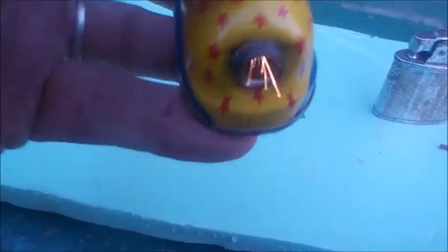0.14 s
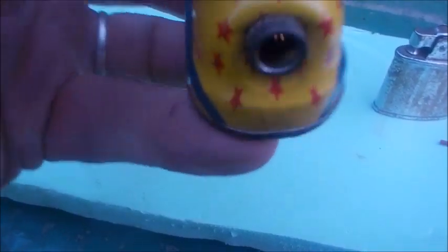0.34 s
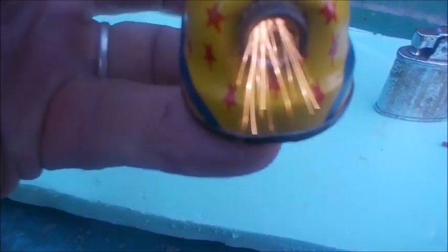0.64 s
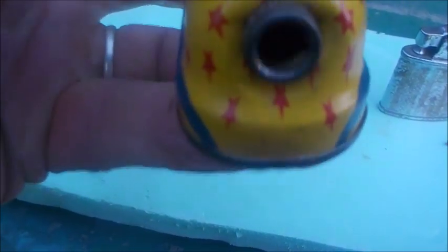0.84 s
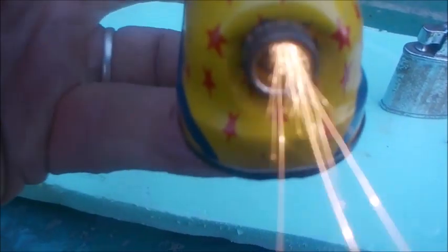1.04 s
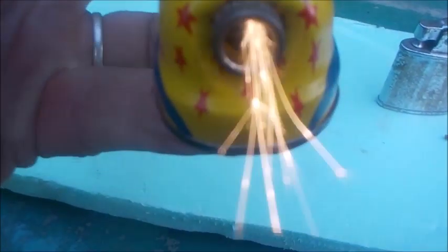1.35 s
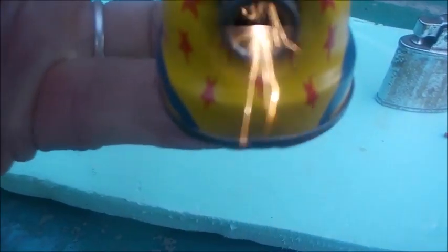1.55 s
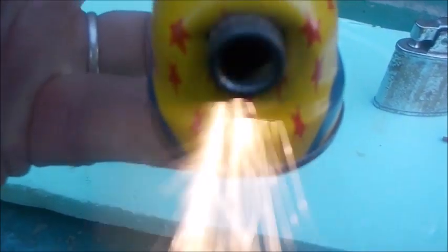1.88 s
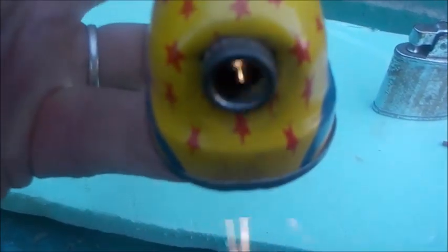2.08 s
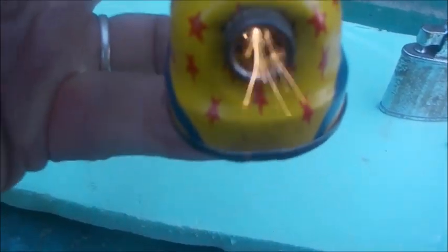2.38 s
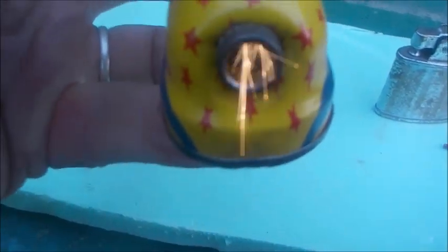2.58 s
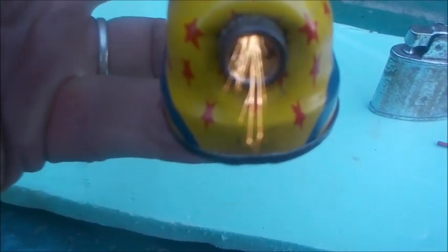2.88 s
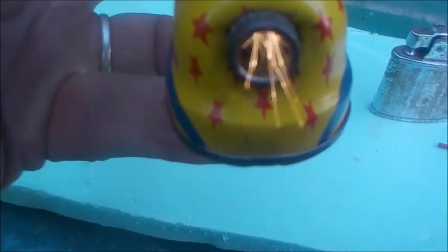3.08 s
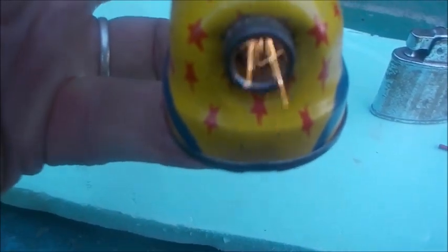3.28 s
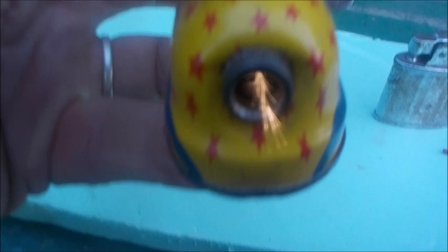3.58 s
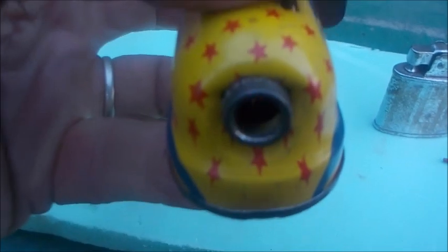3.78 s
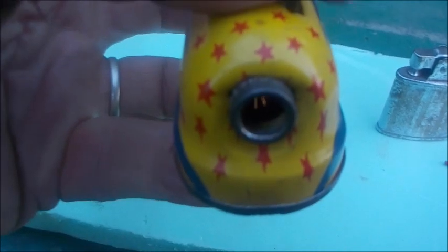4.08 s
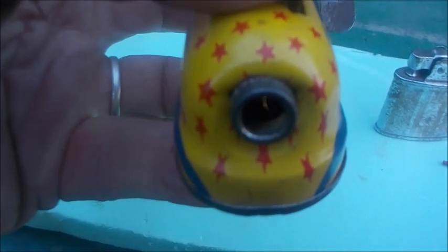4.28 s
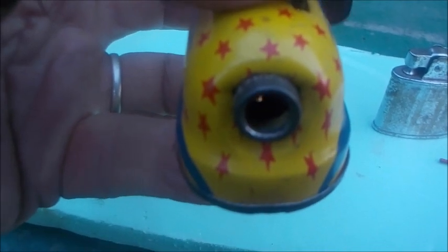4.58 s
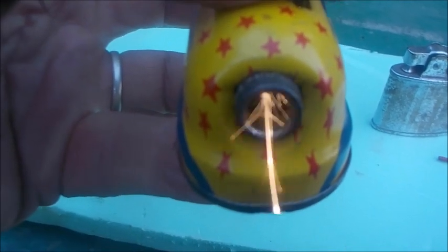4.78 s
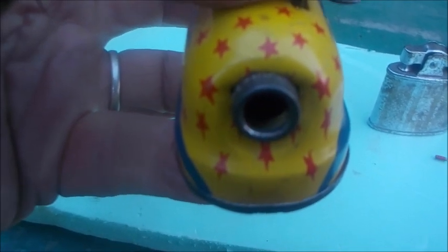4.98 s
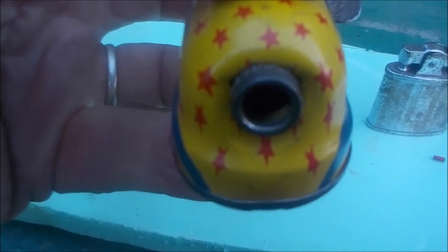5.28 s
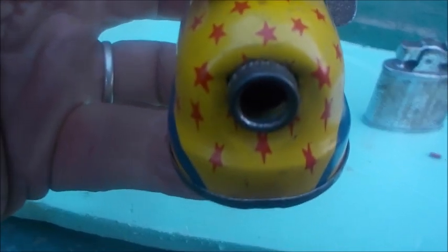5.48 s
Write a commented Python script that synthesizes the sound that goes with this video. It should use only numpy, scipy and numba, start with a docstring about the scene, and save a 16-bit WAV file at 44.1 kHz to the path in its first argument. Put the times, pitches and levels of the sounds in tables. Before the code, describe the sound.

A hand-held clockwork tin toy grinds a rough wheel against flint, very close in stereo in a small indoor space. It spins up within half a second to a shrill, dense rasp with thin hiss, faint gear chatter and scattered sharp clicks. Near five seconds the rasp drops and short bursts of hollow ratchet clacks break in.

```python
"""A tin clockwork sparking toy runs in the hand, close to two microphones indoors.
A gritty wheel grinds on a flint: dense chance impacts, swayed by the flint's pressure, ring flint and body.
The gear train chatters in the tin shell under a thin treble hiss, and snags click as the flint catches.
Near the end the spring goes slack and a ratchet clacks in short runs: impulses that ring the body.
Scatter from table and walls follows; a limiter ducks the highest peaks."""
import sys
import numpy as np
from scipy import signal
from scipy.fft import rfft, irfft
from scipy.io import wavfile
from scipy.ndimage import uniform_filter1d, minimum_filter1d
from numba import njit

SR = 44100
rng = np.random.default_rng(int(sys.argv[2]) if len(sys.argv) > 2 else 0)


def transcribe(signal):
    """Save signal, clipped to [-1, 1], as a 16-bit WAV file at the path in sys.argv[1]."""
    frames = np.atleast_2d(signal).T
    limited = np.clip(frames, -1, 1)
    pcm = np.round(limited * 32767).astype(np.int16)
    wavfile.write(sys.argv[1], SR, pcm)


N = 248724
TIME = np.arange(N) / SR
SIDES = np.array([[1], [-1]])  # left, right

# flint and holder resonance: freq_hz, level_db
FLINT_SPECTRUM = [(200, -102), (2500, -48.5), (3050, -41), (3550, -20), (3950, -13.5), (4380, -3.5),
                  (4820, 1.5), (5150, -8.5), (5600, -7.5), (6200, -13), (6780, -9.5), (7300, -19),
                  (7750, -38.5), (8150, -62.5)]
# wheel's own ring: freq_hz, width_hz, level_db
WHEEL_MODES = [(6787, 295, 0)]
# dull rub of the wheel through the body: freq_hz, level_db
BODY_SPECTRUM = [(30, -39), (70, -47), (250, -22.5), (420, -17), (700, -8), (1050, 0), (1400, 2),
                 (1900, -4.5), (2400, -9), (5000, -85)]
# tin shell rung by the gears: freq_hz, level_db
SHELL_SPECTRUM = [(100, -81), (700, -46), (1000, -30), (1200, -20.5), (1400, -7.5), (1550, 4), (1880, 6),
                  (2020, -3), (2200, -27), (2330, -36), (2450, -70), (4000, -80)]
# shell modes that ring while the grip is loose: freq_hz, width_hz, level_db
LOOSE_MODES = [(1433, 184, -2.5), (1569, 48, 1), (3637, 220, 0.5)]
# thin treble hiss above the rasp, partly distortion: freq_hz, level_db
HISS_SPECTRUM = [(2500, -59), (6000, -26), (8150, -29), (8650, 4.5), (9300, -1.5), (10300, -2.5),
                 (11300, -9), (12300, -3.5), (13600, 3), (15500, -10)]
# gear chatter: time_s, level_db
GEAR_LEVEL = [(0.0, -48.5), (0.14, -36.5), (0.36, -28.0), (0.78, -27.5), (1.02, -32.0), (1.35, -30.0),
              (1.75, -34.0), (2.05, -36.0), (2.33, -36.5), (2.62, -31.0), (2.8, -36.5), (2.92, -35.5),
              (3.38, -36.5), (3.87, -33.0), (4.25, -36.0), (4.6, -37.0), (4.9, -41.0), (5.1, -37.5)]
# toy in the hand: time_s, left_minus_right_db, loose_modes_db
HAND_HOLD = [(0, -2.2, -5), (.5, -1, -9.5), (1.2, -1.5, -12), (1.8, -.5, -30), (3.2, -.5, -20),
             (4.2, -1.5, -8), (5.64, -1.3, -10)]
# wheel and gears between the microphones: freq_hz, left_minus_right_db
WHEEL_BALANCE = [(500, -2), (1300, 0), (1900, 0), (2500, 1.5), (3450, -2.5), (4100, -0.5), (4600, 2.5),
                 (5000, 3.5), (5500, -6.5), (6250, 5.5), (6650, -2.5), (7500, 1), (8100, 1.5)]
# wheel and gears between the microphones: freq_hz, left_lead_rad
WHEEL_PHASE = [(500, .05), (1700, 0.057), (3000, .05), (3400, 0.55), (3850, 0.15), (4300, 0.54),
               (5250, .05), (5700, 0.22), (6500, 0.75), (7500, 0.48), (8500, .15)]


def sparking_wheel():
    """The flint bounces on the wheel; its pressure drives the rasp and shakes the gears."""
    rasp_db = drive()
    gear_db, = follow(GEAR_LEVEL)
    pan_db, loose_db = follow(HAND_HOLD)
    # the wheel starts to ring once the flint bounces on it
    wheel_db = np.interp(TIME, [.7, 1.2, 5], [-28, -8.5, -13])
    # as the spring runs down the gears sink under the rasp
    gear_cap_db = rasp_db + np.interp(TIME, [4.9, 5.15], [-6, -15])
    gear_db = np.minimum(gear_db, gear_cap_db)

    pressure_db = 1.64 * walk(67) + 1.4 * walk(370)
    # the flint only brushes the wheel at first, and bounces more once up to speed
    pressure_db = pressure_db * np.interp(TIME, [0, .45, 1.1], [.45, .65, 1])
    scrape, flank_scrape, rim_scrape = (
        grains(rate_per_s=14000, spread_db=2.0) * undb(pressure_db) for _ in range(3))

    rasp = unit(ring(scrape, FLINT_SPECTRUM)) * undb(rasp_db + 0.3)
    wheel = unit(modes(rim_scrape, WHEEL_MODES)) * undb(rasp_db + wheel_db)
    body = unit(ring(scrape, BODY_SPECTRUM)) * undb(rasp_db - 35.0)
    # rattle of the flanks, opposite in sign at left and right
    flanks = unit(ring(flank_scrape, FLINT_SPECTRUM)) * undb(rasp_db - 13.5)

    chatter = grains(rate_per_s=1800, spread_db=0.5) * undb(0.86 * pressure_db + 1.35 * walk(78))
    gears = unit(ring(chatter, SHELL_SPECTRUM)) * undb(gear_db + 0.56)
    loose_grains = grains(rate_per_s=2500, spread_db=2.5) * undb(pressure_db)
    loose = unit(modes(loose_grains, LOOSE_MODES)) * undb(gear_db + loose_db - 0.5)

    # treble hiss, differing at left and right
    middle, side = (
        unit(ring(rng.standard_normal(N) * undb(pressure_db), HISS_SPECTRUM)) for _ in range(2))
    hiss = (middle + 0.64 * SIDES * side) * undb(rasp_db - 32.0)

    in_room = room(rasp + wheel + body + gears + jolts() + loose, t60_s=0.14, wet_db=-15.0)
    sound = in_room + SIDES * flanks + hiss + snags()
    return ports(sound, WHEEL_BALANCE, WHEEL_PHASE) * undb(SIDES * pan_db / 2)


# wheel spin-up: time_s, level_re_full_speed_db
SPIN_UP_LEVEL = [(0, -14), (.11, -7), (.27, -6.3), (.4, -1.8), (.6, 0)]
# brief dips of the rasp: time_s, depth_db
RASP_LULLS = [(.834, 3.5), (3.188, 6.5)]
LULL_DEEPEST_S = .015
BASE_DB, AT_SPEED_S = -17.6, .6
SURGE_HZ, SURGE_DB, BUILD_S, SETTLE_S = 5.43, 2.0, .15, 0.57
WANDER_DB, WANDER_HZ = .25, 6.2
# spring: slow sag, then a drop as it goes slack and a faster fade
SAG_DB_PER_S, SLACK_AT_S, SLACK_DB, SLACK_S, SLACK_DB_PER_S = -.5, 4.78, -4.5, 0.096, -3.5
STOP_AT_S, STOP_DB_PER_S = 5.54, -42
# the rasp ducks around each run of clacks: lead before the first, time to the deepest dip
DUCK_LEAD_S, DUCK_DEEPEST_S = .002, .018


def drive():
    """Rasp level in dB: spin-up, settling surge, sag, slack spring, stop, ducks around clacks."""
    spin_up_db, = follow(SPIN_UP_LEVEL)
    since_s = TIME - AT_SPEED_S
    surge_envelope = np.exp(-np.abs(since_s) / np.where(since_s > 0, SETTLE_S, BUILD_S))
    surge_db = SURGE_DB * np.cos(2 * np.pi * SURGE_HZ * since_s) * surge_envelope
    sag_db = SAG_DB_PER_S * np.maximum(since_s, 0)
    slack_for_s = np.maximum(TIME - SLACK_AT_S, 0)
    slack_db = SLACK_DB * np.minimum(slack_for_s / SLACK_S, 1) + SLACK_DB_PER_S * slack_for_s
    stop_db = STOP_DB_PER_S * np.maximum(TIME - STOP_AT_S, 0)
    run_s, *_, rasp_duck_db = np.transpose(PAWL_RUNS)
    ducks_db = dips(run_s - DUCK_LEAD_S, rasp_duck_db, DUCK_DEEPEST_S)
    lull_s, lull_db = np.transpose(RASP_LULLS)
    lulls_db = dips(lull_s, lull_db, LULL_DEEPEST_S)
    level_db = BASE_DB + spin_up_db + surge_db + sag_db + slack_db + stop_db - ducks_db - lulls_db
    return level_db + WANDER_DB * walk(WANDER_HZ)


def dips(times_s, depths_db, deepest_s):
    """The level sinks after each moment, then recovers."""
    age = TIME[:SR // 4] / deepest_s
    return signal.fftconvolve(blows(times_s, depths_db), age * np.exp(1 - age))[:N]


# flint catches on a coarse grain: time_s, click_db, knock_db
FLINT_SNAGS = [(.5346, -21, -45), (0.6661, -18, -40), (.8335, -10, -28), (1.027, -23, -42),
               (1.1708, -21, -40), (1.2103, -8, -33), (1.2303, -11, -38), (1.274, -16, -38),
               (1.3318, -23, -42), (1.3817, -18, -35.5), (1.5507, -18, -39), (1.9264, -17, -40),
               (1.979, -20, -38), (2.0303, -11, -45), (2.274, -21, -39.5), (2.4666, -14, -41),
               (2.6838, -17, -42), (2.706, -18, -37), (2.7743, -9.5, -36), (3.1862, -10, -39),
               (3.243, -18, -40), (3.3388, -18, -41), (3.4743, -19.5, -37.5), (3.8997, -9, -38),
               (4.0821, -15, -33), (4.2153, -19, -39)]
# bright click as a loud catch or clack hits the limiter: freq_hz, level_db
CLICK_SPECTRUM = [(200, -48), (2500, -43), (8000, -14), (10000, -4), (12500, -5), (15500, 1)]
# dull knock in the body: freq_hz, level_db
KNOCK_SPECTRUM = [(30, -26), (70, -36), (140, -13), (250, -6), (450, 3), (900, 9), (1600, -0.5),
                  (2400, -30), (6000, -64)]
SMALL_SNAGS_PER_S, SMALL_CLICK_DB, SMALL_KNOCK_DB = 4, -26, -52


def snags():
    """A coarse grain jerks the flint: its holder rings and the body knocks, with a bright click."""
    when_s, click_db, knock_db = np.transpose(FLINT_SNAGS)
    small = strays(SMALL_SNAGS_PER_S, spread_db=3)
    clicks = blows(when_s, undb(click_db)) + small * undb(SMALL_CLICK_DB)
    knocks = blows(when_s, undb(knock_db)) + small * undb(SMALL_KNOCK_DB)
    jerk = ring(np.sqrt(clicks), FLINT_SPECTRUM) * undb(3.5)
    return jerk + ring(clicks, CLICK_SPECTRUM) + ring(knocks, KNOCK_SPECTRUM)


# gear train jolts against the shell: time_s, strength_db
GEAR_JOLTS = [(0.4085, -18), (.48, -21), (0.654, -23), (0.776, -19.5), (1.0494, -19), (1.2103, -13),
              (1.2713, -20), (2.5152, -17.5), (2.5879, -16.5), (3.449, -23), (3.8263, -19), (3.8465, -16.5),
              (3.8677, -20)]
SMALL_JOLTS_PER_S, SMALL_JOLT_DB = 3, -30


def jolts():
    """Now and then the gears jump in their play and give the shell a short knock."""
    when_s, strength_db = np.transpose(GEAR_JOLTS)
    small = strays(SMALL_JOLTS_PER_S, spread_db=4.0) * undb(SMALL_JOLT_DB)
    return ring(blows(when_s, undb(strength_db)) + small, SHELL_SPECTRUM)


def strays(rate_per_s, spread_db):
    """Lone blows at chance moments while the wheel is at speed."""
    at_speed = (TIME > AT_SPEED_S) & (TIME < SLACK_AT_S)
    return (rng.random(N) < rate_per_s / SR) * at_speed * undb(spread_db * rng.standard_normal(N))


# body rung by the pawl: freq_hz, level_db
PAWL_SPECTRUM = [(30, -56), (120, -43), (200, -40), (290, -31), (410, -14.5), (520, -15), (800, -9.5),
                 (1250, 3), (1650, 4), (2020, 5), (2250, -11.5), (2480, -33), (2850, -27), (4000, -46)]
# shell rings on after a clack: freq_hz, width_hz, level_db
AFTER_RING_MODES = [(412, 54, -1.5), (762, 67, -3), (1615, 255, -1.5)]
# ratchet between the microphones: freq_hz, left_minus_right_db
RATCHET_BALANCE = [(60, -1), (200, -14), (380, -8), (700, -9.5), (1000, -9.5), (1400, -1), (2000, -9),
                   (2400, -12), (8000, -13)]
# ratchet between the microphones: freq_hz, left_lead_rad
RATCHET_PHASE = [(200, -1), (700, -0.7), (1300, 0.3), (1700, -1.1), (2400, -3), (8000, 1)]


def ratchet():
    """Runs of hollow clacks: the pawl drags and drops over teeth, and the shell rings on."""
    when_s, size = pawl_drops()
    contact = signal.fftconvolve(blows(when_s, size ** 0.39), np.hanning(int(0.049 * SR)), "same")
    drag = grains(rate_per_s=2000, spread_db=-0.5) * contact * undb(-29.5)
    after_ring = modes(blows(when_s + 0.001175, size), AFTER_RING_MODES)
    clack = ring(blows(when_s, size) + drag + after_ring, PAWL_SPECTRUM) * undb(-10.0)
    # squared size: harder drops have a relatively brighter click
    click = ring(blows(when_s + .0005, size ** 2), CLICK_SPECTRUM) * undb(-24)
    sound = room(clack + click, t60_s=.028, wet_db=-8)
    return ports(sound, RATCHET_BALANCE, RATCHET_PHASE)


# pawl skips over ratchet teeth: start_s, teeth_count, tooth_gap_s, strength_db, rasp_duck_db
PAWL_RUNS = [(5.157, 4, .0053, -.5, 7), (5.2074, 2, .0114, -.5, 10), (5.2806, 4, .0106, 1, 5.5),
             (5.3493, 3, .0107, -3, .5), (5.4471, 3, .024, -16, 6.5), (5.512, 1, .01, -15, .5),
             (5.536, 1, .01, -0.5, 5), (5.582, 4, .0103, -0.5, 6)]
LAST_TOOTH_DB = -8


def pawl_drops():
    """Times and sizes of the drops: evenly spaced, the last of several softer."""
    drops = []
    for start_s, teeth, gap_s, strength_db, _ in PAWL_RUNS:
        last = int(round(teeth)) - 1
        for k in range(last + 1):
            softer_db = LAST_TOOTH_DB * (0 < k == last)
            drops.append((start_s + k * gap_s, undb(strength_db + softer_db)))
    return np.transpose(drops)


def grains(rate_per_s, spread_db):
    """Dense tiny impacts of uneven size."""
    hits = rng.random(N) < rate_per_s / SR
    return hits * rng.standard_normal(N) * undb(spread_db * rng.standard_normal(N))


def blows(times_s, sizes):
    """One impulse for each time."""
    return np.bincount(np.clip(np.round(times_s * SR).astype(int), 0, N - 1), sizes, N)


def ring(x, spectrum, size=2048):
    """Pass x through a minimum-phase body with this spectrum; a unit blow peaks at 1."""
    cepstrum = irfft(np.log(undb(along(spectrum, size))))
    # fold the cepstrum to make the response causal
    cepstrum[1:size // 2] *= 2
    cepstrum[size // 2 + 1:] = 0
    response = irfft(np.exp(rfft(cepstrum)))
    return signal.fftconvolve(x, response / np.abs(response).max())[:N]


def modes(x, table):
    """Pass x through steep parallel resonances and sum them."""
    total = 0
    for hz, width_hz, level_db in table:
        edges_hz = [hz - width_hz / 2, hz + width_hz / 2]
        band = signal.butter(2, edges_hz, "band", fs=SR, output="sos")
        total = total + undb(level_db) * signal.sosfilt(band, x)
    return total


def walk(rate_hz):
    """Smooth chance with a spread of 1: low-passed noise."""
    lowpass = signal.butter(2, rate_hz, fs=SR, output="sos")
    return unit(signal.sosfilt(lowpass, rng.standard_normal(N)))


def follow(table):
    """The columns of a curve table at every sample."""
    time_s, *columns = np.transpose(table)
    return [np.interp(TIME, time_s, column) for column in columns]


def along(points, size):
    """Read (freq_hz, value) points on the bins of a transform, on a log-frequency axis."""
    hz, value = np.transpose(points)
    bins_hz = np.arange(size // 2 + 1) * SR / size
    return np.interp(np.log(bins_hz + 1), np.log(hz), value)


def undb(db):
    """Decibels to gain."""
    return 10 ** (np.asarray(db) / 20)


def unit(x):
    """Scale to an rms of 1."""
    return x / np.sqrt(np.mean(x ** 2))


def room(x, t60_s, wet_db, size=8192):
    """Direct sound plus scatter from the table and walls, different at each microphone."""
    t = np.arange(size) / SR
    tails = rng.standard_normal((2, size)) * undb(-60 * t / t60_s) * (t > .002)
    tails /= np.sqrt(np.sum(tails ** 2, axis=1, keepdims=True))
    return x + undb(wet_db) * signal.fftconvolve(x[None], tails, axes=1)[:, :N]


def ports(x, balance, phase):
    """The two microphone ports hear each frequency at their own level and phase."""
    gain = undb(SIDES * along(balance, N) / 2)
    turn = np.exp(.5j * SIDES * along(phase, N))
    return irfft(rfft(x) * gain * turn, N)


def scene():
    """The sparking wheel and the ratchet."""
    return sparking_wheel() + ratchet()


@njit
def limiter(peak, top, recovery):
    """A gain that drops as far as each peak needs, then creeps back."""
    gains, gain = np.empty(len(peak)), 1.
    for i in range(len(peak)):
        gain = min(gain + (1 - gain) * recovery, top / (peak[i] + 1e-9))
        gains[i] = gain
    return gains


def record(dry, top_db=-5.5, release_s=0.015, bend=0.044, cutoff_hz=15800):
    """The limiter ducks just ahead of each peak, a cubic bend rounds slightly, and the top is cut."""
    gain = limiter(np.abs(dry).max(axis=0), float(undb(top_db)), 1 / (release_s * SR))
    gain = minimum_filter1d(gain, size=65)  # centred, so it looks ahead
    smooth_gain = uniform_filter1d(uniform_filter1d(gain, size=33), size=33)
    held = dry * smooth_gain
    rounded = held - bend * held ** 3 / 2
    return signal.sosfilt(signal.ellip(10, .1, 70, cutoff_hz, fs=SR, output="sos"), rounded)


dry = scene()
out = record(dry)
transcribe(out)
```